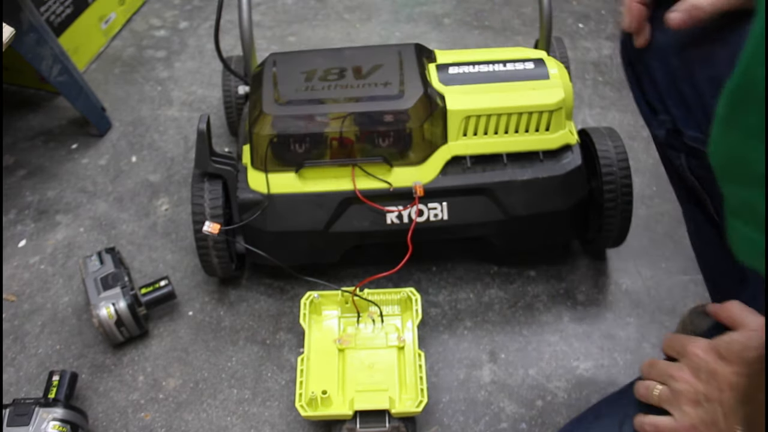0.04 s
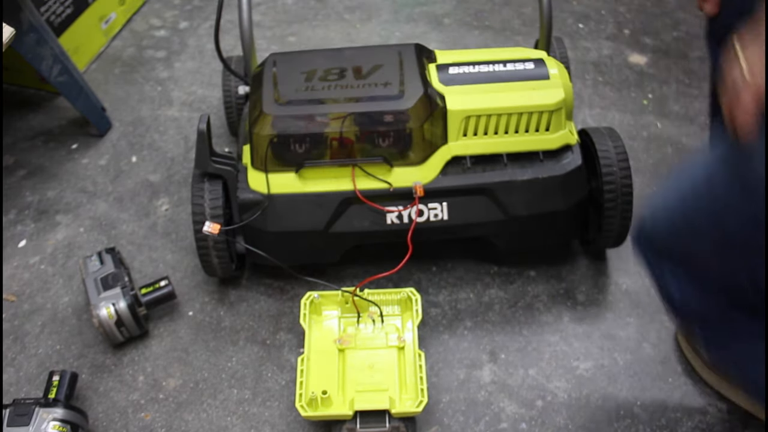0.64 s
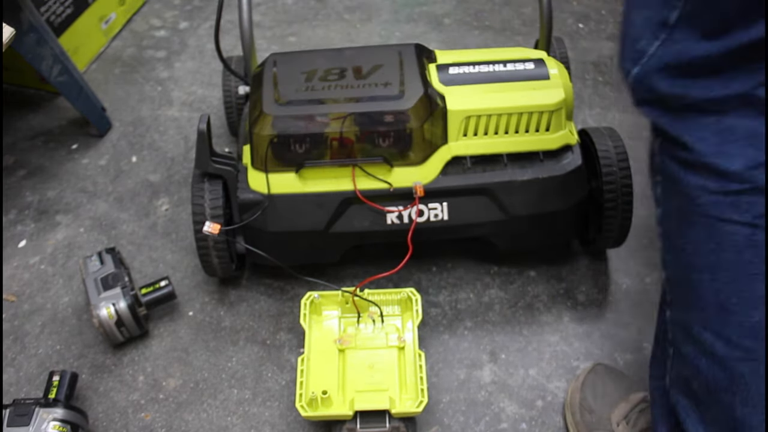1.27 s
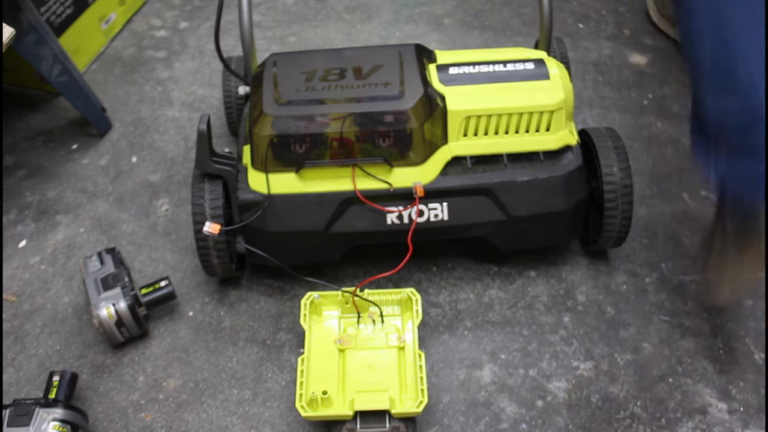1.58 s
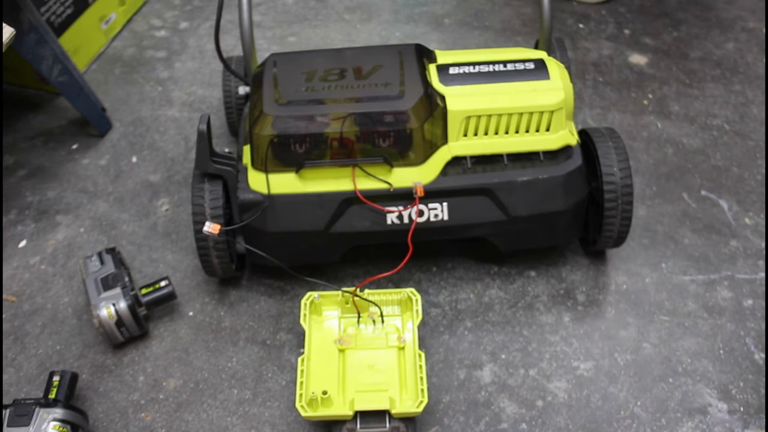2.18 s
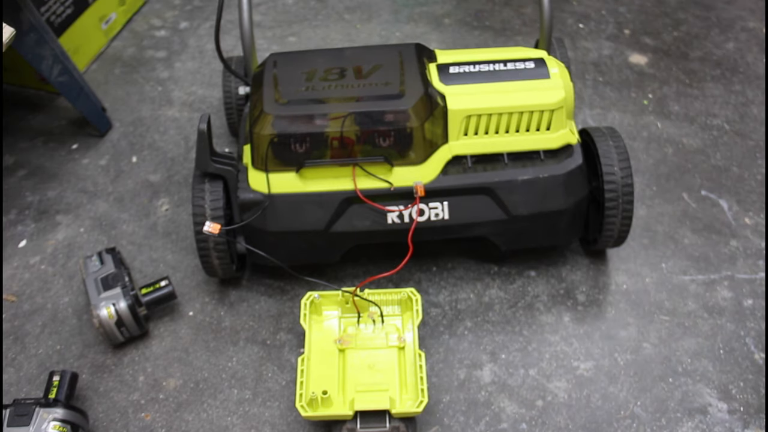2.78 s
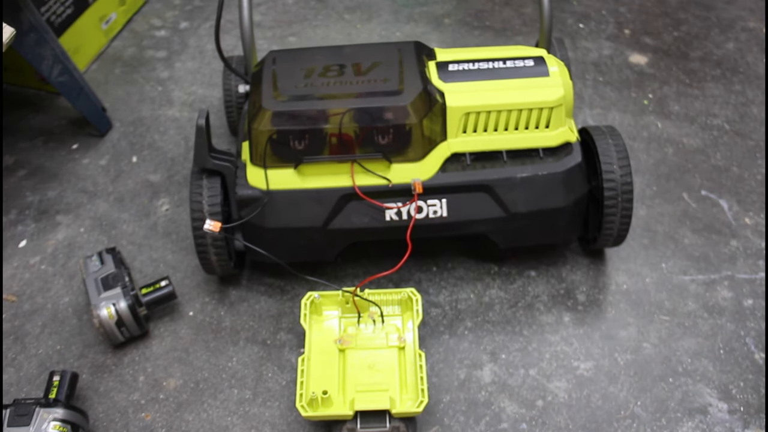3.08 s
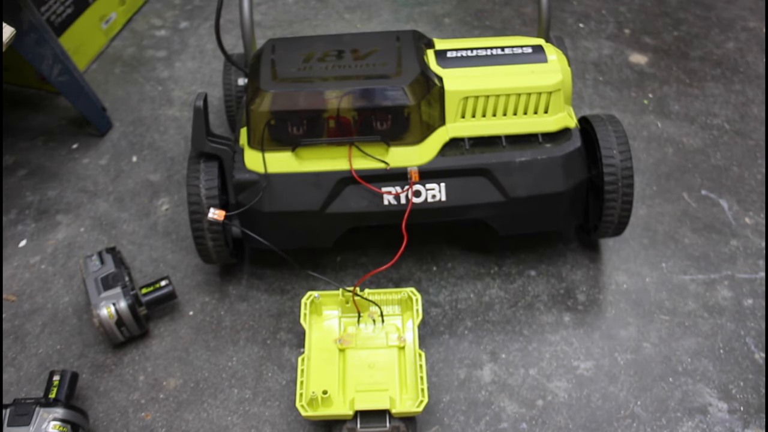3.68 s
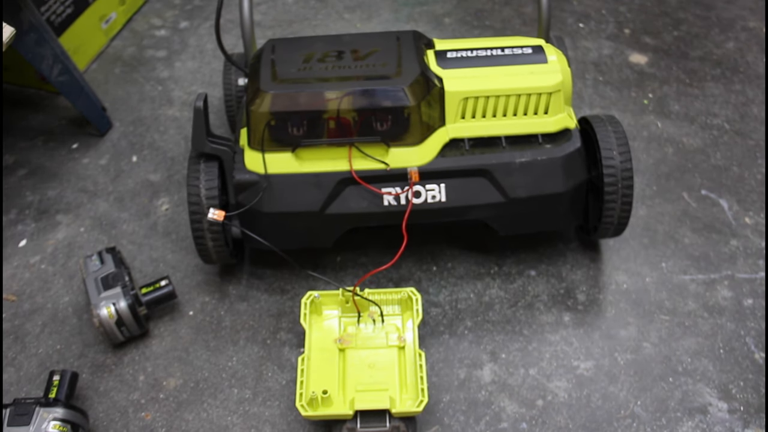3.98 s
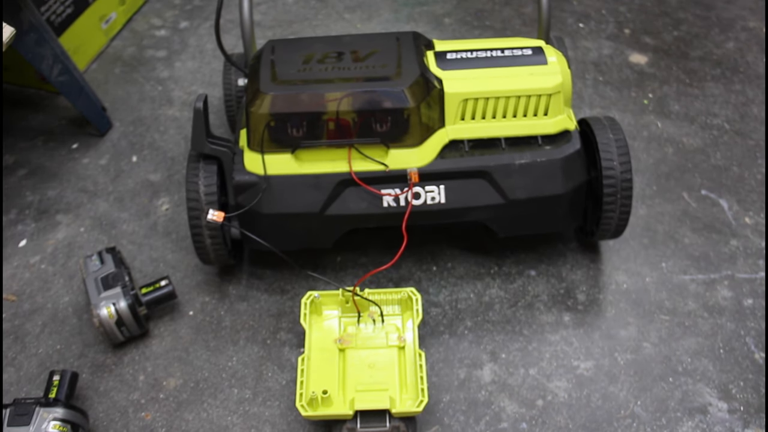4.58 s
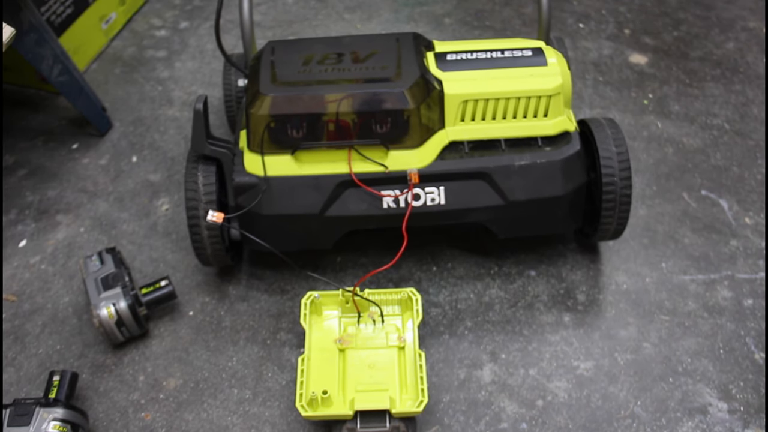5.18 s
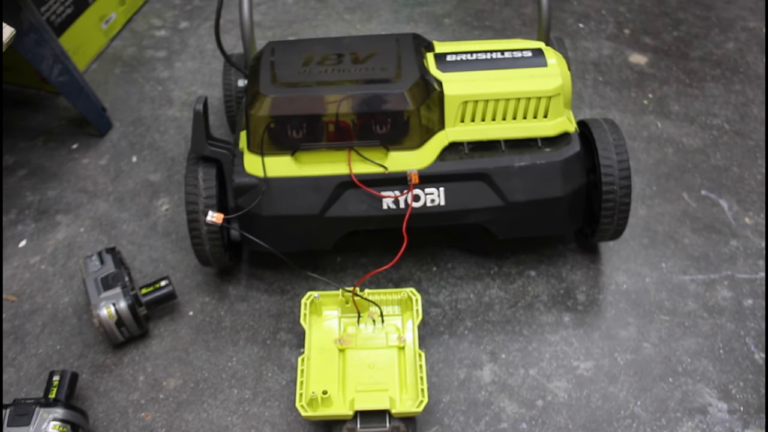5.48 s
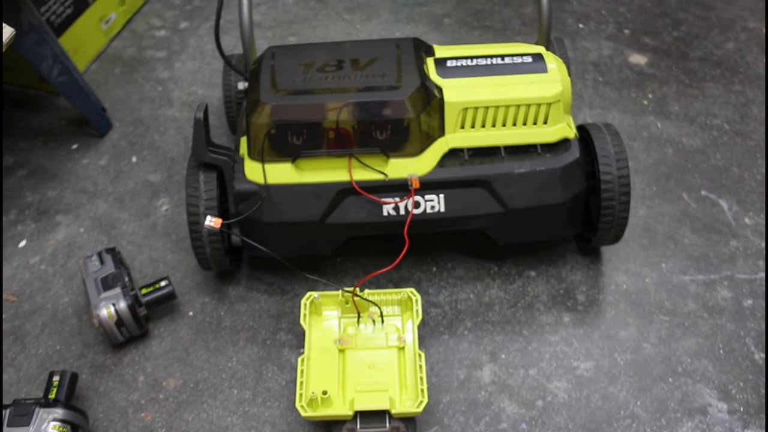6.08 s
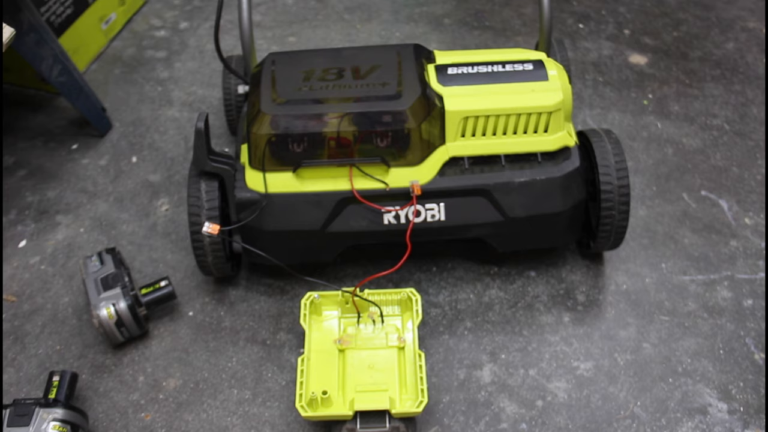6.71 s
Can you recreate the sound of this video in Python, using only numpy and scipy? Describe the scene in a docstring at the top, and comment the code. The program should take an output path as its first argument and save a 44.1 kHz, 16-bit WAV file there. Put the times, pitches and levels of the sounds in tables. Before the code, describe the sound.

A few footsteps on a concrete floor come with soft trouser rustle and faint clicks. Then a small electric reel mower, heard close up in stereo, spins up with a climbing whine and runs briefly with a plastic rattle and a light scraping. It winds down with a falling pitch and ends in several quick knocks, over faint workshop room tone.

```python
"""A workshop with a concrete floor, on a stereo microphone pair.
Over still air, someone gets up and steps away, denim swishing and soles rubbing. At 3.6 s a switch
clicks and a cordless reel mower starts. Its brushless motor drives the reel through one gear pair: the
tooth whine climbs through the resonances of the plastic housing and gives way to a loose rattle at full
speed. From 5.5 s the motor brakes, the whine falls, and gears and reel knock to rest."""
import sys
import numpy as np
from scipy import signal
from scipy.fft import rfft, irfft, next_fast_len
from scipy.io import wavfile
from scipy.ndimage import uniform_filter1d

SR = 44100
rng = np.random.default_rng(int(sys.argv[2]) if len(sys.argv) > 2 else 0)


def dump_mix(stems):
    """Bounce the given channels to the path in sys.argv[1] as a 16-bit WAV at rate SR."""
    frames = np.atleast_2d(stems).T  # one column per channel
    limited = np.clip(frames, -1, 1)  # hard clip at full scale
    pcm = np.round(limited * 32767).astype(np.int16)
    wavfile.write(sys.argv[1], SR, pcm)


N = 302085
TIME = np.arange(N) / SR


def undb(db):
    """Decibels to gain."""
    return 10 ** (np.asarray(db) / 20)


def unit(x):
    """Scale to rms 1."""
    return x / np.sqrt(np.mean(x ** 2))


def shape(x, response):
    """Filter by a response given as a function of frequency."""
    size = next_fast_len(N + SR // 2)
    hz = np.maximum(np.arange(size // 2 + 1) * SR / size, 1)
    return irfft(rfft(x, size) * response(hz), size)[..., :N]


def colour(points):
    """Response through (f/Hz, level/dB) points."""
    at, db = np.transpose(points)
    return lambda hz: undb(np.interp(np.log(hz), np.log(at), db))


def resonances(modes):
    """Response of a body; neighbouring modes move in opposite directions."""
    return lambda hz: sum((-1) ** k * undb(db) / (1 + 1j * (hz ** 2 - f ** 2) / (hz * width))
                          for k, (f, width, db) in enumerate(modes))


def noise(points):
    """Coloured noise of rms 1."""
    return unit(shape(rng.standard_normal(N), colour(points)))


def walk(rate_hz):
    """Smooth random drift with a spread near 1."""
    hold = int(SR / rate_hz)
    stairs = np.repeat(rng.standard_normal(N // hold + 1), hold)
    return 1.3 * uniform_filter1d(uniform_filter1d(stairs, hold), hold)[:N]


def tone(cycles):
    """A sine of rms 1 that starts anywhere in its cycle."""
    return np.sqrt(2) * np.sin(2 * np.pi * (cycles + rng.random()))


def decay(t, t60):
    """A fade of 60 dB in t60 seconds."""
    return np.exp(-np.log(1000) * t / t60)


# spectrum of the room tone (f/Hz, level/dB)
AIR_COLOUR = [(12, -39.5), (20, 5.5), (32, -11), (65, -0.5), (88, -10), (130, -7), (167, -17), (187, -16.5),
              (284, -5), (326, -10.5), (386, -8.5), (733, -20), (1210, -22.5), (1840, -30), (15800, -29.5)]

def air(level_db=-58, side_db=-7):
    """Room tone: still air and faint hiss, mostly common to both microphones."""
    mid, side = noise(AIR_COLOUR), noise(AIR_COLOUR)
    return undb(level_db) * (mid + undb(side_db) * side * np.array([[1], [-1]]))


# trouser legs and soles brushing (t/s, half length/s, swish level/dB, rub level/dB)
BRUSHES = [(.15, .24, -59, -57), (0.613, 0.25, -71, -66), (.974, 0.2, -67, -62.5),
           (1.47, 0.096, -61.5, -62), (1.932, .049, -53.5, -58.5), (2.066, 0.022, -57, -63),
           (2.607, 0.084, -59.5, -60.5), (2.752, .056, -49, -76), (2.823, 0.027, -65, -48)]
# spectra of denim and of soles (f/Hz, level/dB)
SWISH_COLOUR = [(710, -27), (1200, -7.5), (1870, -0.5), (3530, 3.5), (6180, 0), (7110, 1.5), (15800, -11)]
RUB_COLOUR = [(80, -33), (160, -8), (280, -12), (450, -4.5), (630, -4.5), (850, -7), (1100, -9.5),
              (1330, -6.5), (1700, -16), (2500, -15), (4000, -50)]

def brushes(grain_db=1.5):
    """Denim swishes and soles rub on gritty concrete, each in one swell."""
    swish, rub = 0, 0
    for at, half, swish_db, rub_db in BRUSHES:
        swell = np.exp(-((TIME - at) / half) ** 2)
        swish += undb(swish_db) * swell
        rub += undb(rub_db) * swell
    return (swish * noise(SWISH_COLOUR) + rub * noise(RUB_COLOUR)) * undb(grain_db * walk(200))


# thud, body, clack and tick ranges of a blow (low f/Hz, high f/Hz)
KNOCK_BANDS = [(130, 626), (330, 1200), (1300, 3970), (3800, 11800)]

def knocks(blows, bands_db, crack, crack_s, thud_stretch=1.25):
    """Blows crack and die away in four ranges, the thud last; brightness tilts them about the body."""
    out, t = np.zeros(N + SR), np.arange(SR // 2) / SR
    octaves = np.log2(KNOCK_BANDS).mean(axis=1)
    for at, level_db, brightness, t60 in blows:
        start = int(at * SR)
        for k, (band, db) in enumerate(zip(KNOCK_BANDS, bands_db)):
            sos = signal.butter(3, band, "bandpass", fs=SR, output="sos")
            grain = unit(signal.sosfilt(sos, rng.standard_normal(SR)))[-len(t):]
            attack = 1 - np.exp(-t * band[1])
            fade = decay(t, t60 * (thud_stretch if k == 0 else 1)) + crack * np.exp(-t / crack_s)
            size = undb(level_db + db + brightness * (octaves[k] - octaves[1])) / np.sqrt(1 + crack)
            out[start:start + len(t)] += size * grain * attack * fade
    return out[:N]


# footfalls (t/s, level/dB, brightness/dB per octave, t60/s)
STEPS = [(.387, -52, -1, .05), (.478, -55, 1, .05), (.8465, -35, 0.5, 0.08), (1.329, -50, -5, 0.2),
         (1.522, -52.5, -4, 0.076), (1.848, -55, -6, 0.046), (2.496, -35, 1, 0.18),
         (2.729, -49.5, -5, 0.35), (2.839, -49, 5, 0.26)]

def footsteps():
    """Shoes land on the concrete floor with a crack and a thud."""
    return knocks(STEPS, bands_db=(0, -1.5, -15.5, -27.5), crack=2.2, crack_s=.0037)


# clicks, the last two from the switch in the handle (t/s, level/dB, brightness/dB per octave, t60/s)
CLICKS = [(.648, -49.5, 0.5, .012), (.856, -43.5, 0.5, 0.22), (1.503, -47, -1.5, 0.035),
          (3.173, -51, -1, 0.21), (3.576, -46.5, 1.5, 0.18)]
# bright ring of the clicks (f/Hz, width/Hz, level/dB)
CLICK_MODES = [(1350, 90, 3), (2350, 140, 3), (3450, 160, 1), (4550, 200, 7), (6500, 260, 5),
               (7300, 260, 6)]

def clicks():
    """Sharp clicks with a brief bright ring: grit under a sole, then the handle's switch."""
    snaps = knocks(CLICKS, bands_db=(-.57, -.59, -.085, .99), crack=.41, crack_s=.0015)
    return shape(snaps, lambda hz: .8 + resonances(CLICK_MODES)(hz))


START_S, BRAKE_S, STOP_S = 3.657, 5.5094, 6.3503
FULL_HZ = 89.72  # motor turns per second at full speed
PINION_TEETH, WHEEL_TEETH, POLES = 19, 74, 14
GEAR_RATIO = PINION_TEETH / WHEEL_TEETH

def drive(pull_db=-1.5, cruise_db=-13.5, brake_db=-15, knee=24):
    """Speed, current and strain: the motor pulls until its governor holds full speed, then brakes."""
    ramp_hz = 130.1 * np.maximum(TIME - START_S, 0) ** .8867
    pull = 1 / (1 + (ramp_hz / FULL_HZ) ** knee)
    brake_left = np.clip((STOP_S - TIME) / (STOP_S - BRAKE_S), 0, 1)
    speed = ramp_hz * pull ** (1 / knee) * brake_left ** 1.452
    pulling = uniform_filter1d(pull * (TIME > START_S), SR // 100)
    braking = uniform_filter1d(1. * (TIME > BRAKE_S), SR // 100)
    load = undb(cruise_db) * (1 - braking) + undb(brake_db) * braking
    current = undb(pull_db) * pulling + load * np.sqrt(speed / FULL_HZ)
    return speed, current, pulling + braking


# stator modes rung by the switching (f/Hz, width/Hz, level/dB)
SWITCHING_MODES = [(1902, 54, 2.5), (7900, 46, -15.5)]

def switching_buzz(current, level_db=-44):
    """Switching the windings keeps two stator modes ringing at any speed."""
    return current * undb(level_db) * unit(shape(rng.standard_normal(N), resonances(SWITCHING_MODES)))


def chopper(turns, current, rate_hz=16000, level_db=-70):
    """The controller chops the current; the poles pull a thin sideband down from its rate."""
    return current * undb(level_db) * tone(rate_hz * TIME - POLES * turns + .2 * walk(300))


# overtones of the whine (multiple of the tooth rate, relative level/dB)
OVERTONES = [(2, -21), (3, -24), (4, -30), (5, -31)]
# pull of the magnets (multiple of the turn rate, level/dB at full current)
MAGNET_ORDERS = [(28, -33), (35, -40), (42, -33), (56, -47)]
# modes of the motor's metal (f/Hz, width/Hz, level/dB)
STATOR_MODES = [(1420, 110, -15.5), (1890, 81, 1.5), (2470, 180, -7), (3130, 390, -9), (4500, 156, -15.5),
                (7700, 150, 1.5)]

def stator(turns, current, swell, running, idle_db=-27, drive_db=10):
    """Tooth overtones and magnetic pull ring the metal, fluttering as the teeth bounce in their play."""
    def fluttering(cycles, orders):
        return sum(undb(db + 4 * walk(70) - 2) * tone(k * cycles) for k, db in orders)
    overtones = swell * undb(idle_db + drive_db * current) * fluttering(PINION_TEETH * turns, OVERTONES)
    magnets = current * fluttering(turns, MAGNET_ORDERS)
    return shape(running * (overtones + magnets), resonances(STATOR_MODES))


# cogging of the magnets (multiple of the turn rate, level/dB)
COGGING_ORDERS = [(70, -47), (98, -43)]
# stator modes rung by the cogging (f/Hz, width/Hz, level/dB)
COGGING_MODES = [(1890, 130, 0), (7970, 140, -1)]

def cogging(turns, running):
    """Cogging needs no current; two stator modes squeal as it sweeps through them."""
    force = sum(undb(db) * tone(k * turns) for k, db in COGGING_ORDERS)
    return shape(running * force, resonances(COGGING_MODES))


# modes of the plastic housing (f/Hz, width/Hz, level/dB)
HOUSING_MODES = [(110, 210, -16.5), (194, 94, -9.5), (239, 10.3, 3.5), (291, 14, -3), (343.5, 32.4, -2),
                 (461, 68, -6), (655.7, 54.7, 0.5), (797.6, 35.5, -2), (940, 70, -2.5), (1091, 27.5, -4),
                 (1186, 55, -6), (1358, 40, -2), (1468.5, 24, -4.5), (1570, 79, -9.5), (1687, 62, -14),
                 (1890, 170, -19.5), (2353, 50, -19.5)]

def housing(hz, baffle_hz=170):
    """The plastic shell rings, but is too small to radiate deep bass."""
    return resonances(HOUSING_MODES)(hz) / np.sqrt(1 + (baffle_hz / hz) ** 4)


# knocks in the drive, and a last heel strike on the floor at 6.47 s (t/s, level/dB, brightness/dB per octave,
# t60/s)
BACKLASH = [(3.665, -32, 1.5, 0.83), (5.803, -45, 7, .025), (5.926, -41, 5, .028), (6.04, -32.5, 1, 0.14),
            (6.125, -29, 0.5, 0.28), (6.178, -30, 1.5, 0.17), (6.276, -41.5, -4.5, 0.047),
            (6.474, -36, -4, 0.12)]

def backlash():
    """Gears and reel knock across their play on starting and stopping; the last blow is a heel landing on the
    floor."""
    return knocks(BACKLASH, bands_db=(-3, -7.5, -22.5, -38.5), crack=.71, crack_s=.0046)


def rattle(turns, speed, level_db=-23, jolt_db=6, jolt_s=.3, slow_hz=10.7, wear=.66, soft_hz=900):
    """Each loose tooth strikes the housing, harder at the starting jolt; slow impacts are duller."""
    tooth = np.arange(1, int(turns[-1] * PINION_TEETH))
    wheel_errors = rng.standard_normal(WHEEL_TEETH)
    size_chance, time_chance = rng.standard_normal((N // 20, 2))[tooth].T
    size = wear * wheel_errors[tooth % WHEEL_TEETH] + size_chance
    at = np.searchsorted(turns * PINION_TEETH, tooth + .12 * time_chance)
    hard = unit(shape(np.bincount(np.minimum(at, N - 1), size, N), housing))
    soft = shape(hard, lambda hz: 1 / (1 + 1j * hz / soft_hz))
    impacts = (soft + (hard - soft) * speed / FULL_HZ) * np.sqrt(np.mean(speed) / FULL_HZ)
    jolt = np.exp(-((TIME - START_S) / jolt_s) ** 2)
    return impacts * undb(level_db + jolt_db * jolt) * speed ** 2 / (speed ** 2 + slow_hz ** 2)


def tooth_whine(turns, speed, strain, level_db=-15, strain_db=2.5, low_hz=270,
                dead_hz=490, dead_width_hz=66, dead_db=-15):
    """Loaded teeth whine more with speed and strain, but barely move the housing around dead_hz."""
    tooth_hz = PINION_TEETH * speed
    dead = np.exp(-((tooth_hz - dead_hz) / dead_width_hz) ** 2)
    low_cut = tooth_hz ** 5 / np.hypot(tooth_hz ** 5, low_hz ** 5)
    force = undb(level_db + strain_db * strain + dead_db * dead) * (speed / FULL_HZ) ** .74
    return force * low_cut * tone(PINION_TEETH * turns)


# uneven pinion, uneven reel wheel, and a tooth sideband from the bearing cage, which lags the shaft
# (multiple of the shaft's turn rate, relative level/dB at full speed)
PINION_ORDERS = [(1, -53), (2, -39.5), (3, -36), (4, -47.5), (6, -32), (7, -32.5), (9, -47.5), (10, -45.5),
                 (11, -34), (13, -34), (15, -38), (16, -38.5), (26, -46.5)]
WHEEL_ORDERS = [(5, -49), (11, -31), (13, -33.5), (14, -32), (15, -38), (16, -31), (20, -32.5), (25, -47.5),
                (29, -28.5), (34, -31), (35, -49), (41, -39), (63, -34), (72, -33), (79, -39), (80, -43),
                (81, -38)]
BEARING_ORDERS = [(19.6, -39)]

def gear_shake(turns, speed, level_db=-1, flutter_db=.5, play_cycles=.045):
    """Tooth errors repeat with every turn and shake the shell; backlash blurs their timing."""
    shake = 0
    for ratio, orders in ((1, PINION_ORDERS + BEARING_ORDERS), (GEAR_RATIO, WHEEL_ORDERS)):
        for k, db in orders:
            force = undb(db + flutter_db * walk(12)) / abs(housing(k * ratio * FULL_HZ))
            shake += force * tone(k * ratio * turns + play_cycles * walk(70))
    return undb(level_db) * (speed / FULL_HZ) ** 1.18 * shake


def ringing(x, t60=.11):
    """The many high modes of a struck thing ring briefly after the contact."""
    t = np.arange(SR // 10) / SR
    ring = rng.standard_normal(len(t)) * decay(t, t60)
    return .9 * x + .42 * signal.fftconvolve(x, ring / np.linalg.norm(ring))[:len(x)]


# spectrum of the rubbing drive (f/Hz, level/dB)
SCRAPE_COLOUR = [(1180, -32), (2000, 2.5), (2180, -1), (2360, -2), (2830, -5), (3450, -3.5), (3760, -6.5),
                 (4750, -4), (5600, -20.5), (6480, -8.5), (7190, -15), (8400, -10.5), (10500, -38),
                 (13500, -24.5), (15800, -40)]

def scrape(turns, speed, current, level_db=-37.5, drive_db=1, loudest_hz=83, tick_s=.0012):
    """The drive rubs and ticks twice a turn; the ticks merge into the rubbing as it speeds up."""
    def tick(phase):
        since = (turns - phase) % 1 / np.maximum(speed, 1)
        return np.exp(-since / tick_s)
    depth = 8.5 - 7.2 * speed / FULL_HZ
    contact = 1 + depth * (tick(.3) + .3 * tick(.8)) * undb(2.5 * walk(60))
    contact /= np.sqrt(uniform_filter1d(contact ** 2, SR // 10))
    force = undb(level_db + drive_db * current) * np.minimum(speed / loudest_hz, 1) ** 1.63
    return ringing(noise(SCRAPE_COLOUR) * contact * force)


def mower():
    """The mower up close: one shaft times the gears in the housing and the motor's ringing metal."""
    speed, current, strain = drive()
    turns = np.cumsum(speed * (1 + .0018 * walk(25))) / SR
    running = np.clip(speed / 2, 0, 1)
    # the wheel runs slightly out of true, so the tooth load swells twice per wheel turn
    swell = 1 + .17 * tone(2 * GEAR_RATIO * turns) + .22 * walk(120)
    gears = swell * tooth_whine(turns, speed, strain) + gear_shake(turns, speed)
    shell = shape(running * gears, housing)
    motor = stator(turns, current, swell, running) + cogging(turns, running)
    motor += switching_buzz(current) + running * chopper(turns, current)
    return shell + motor + rattle(turns, speed) + running * scrape(turns, speed, current)


def workshop(x, near_db=-9, near_t60=.16, tail_db=-13, low_t60=.643, treble_t60=.5, split_hz=2500):
    """Quick bounces off the nearby floor and bench, then the room's tail, different on each side."""
    t = np.arange(SR // 2) / SR
    near_fade, low_fade, treble_fade = (decay(t, s) * (t > .001) for s in (near_t60, low_t60, treble_t60))
    near, diffuse = rng.standard_normal((2, 2, len(t)))
    low = signal.sosfilt(signal.butter(1, split_hz, fs=SR, output="sos"), diffuse)
    tail = (low * low_fade + (diffuse - low) * treble_fade) / np.linalg.norm(low_fade)
    # bounces from the sides reach the two microphones in opposite senses
    bounces = (near - near[::-1]) / 2 * near_fade / np.linalg.norm(near_fade)
    return x + signal.fftconvolve(x, undb(near_db) * bounces + undb(tail_db) * tail, axes=1)[:, :N]


# balance at the microphones (f/Hz, left minus right level/dB)
BALANCE = [(60, -3), (110, 1.5), (200, 5), (380, 1.5), (700, 1), (1290, 1.5), (2380, 0.5), (4400, 0.5),
           (8120, 0), (15000, 0.5)]

def scene():
    """Person and mower share the workshop; the left microphone picks them up slightly louder."""
    sources = footsteps() + clicks() + backlash() + mower() + brushes()
    pair = [shape(sources, colour([(hz, side * db / 2) for hz, db in BALANCE])) for side in (1, -1)]
    return workshop(np.array(pair)) + air()


def record(dry):
    """The camera behind the microphones cuts the treble above 15.8 kHz."""
    return signal.sosfilt(signal.ellip(10, .2, 80, 15800, fs=SR, output="sos"), dry)


dry = scene()
out = record(dry)
dump_mix(out)
```